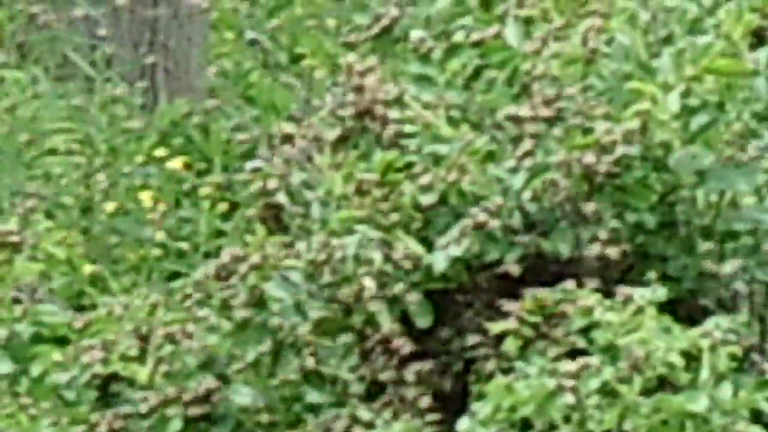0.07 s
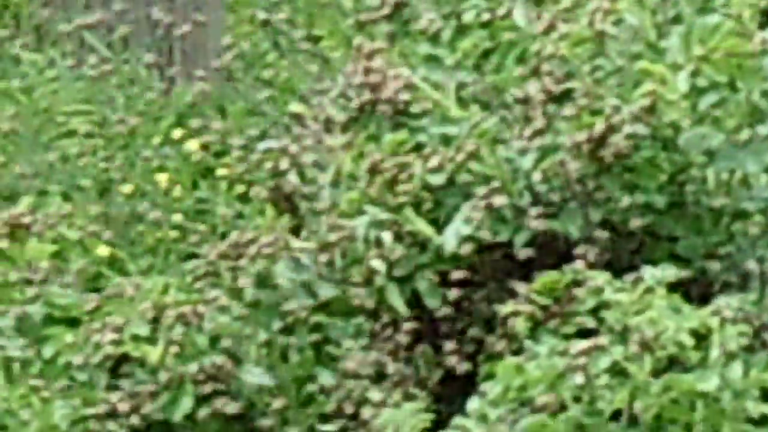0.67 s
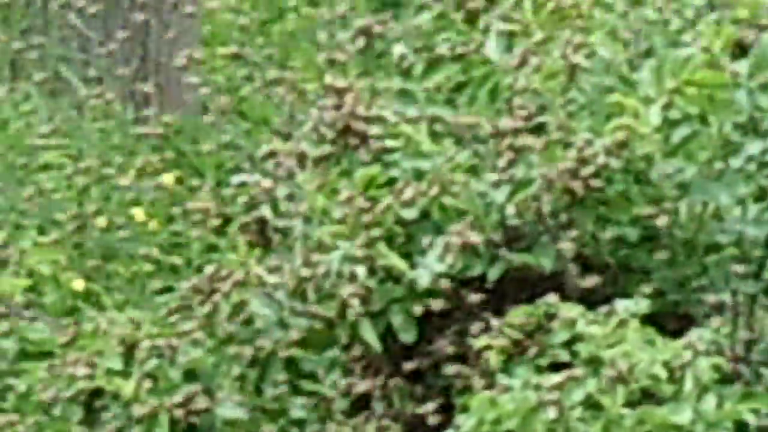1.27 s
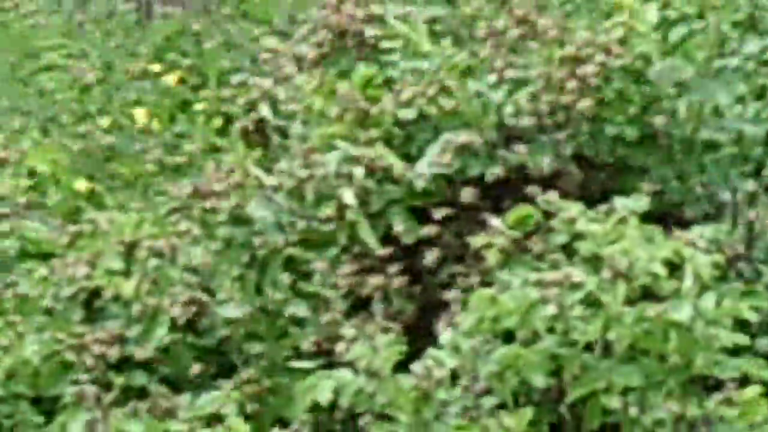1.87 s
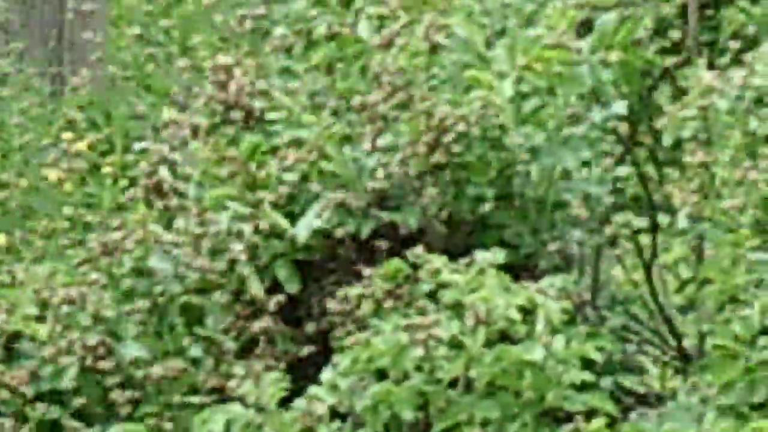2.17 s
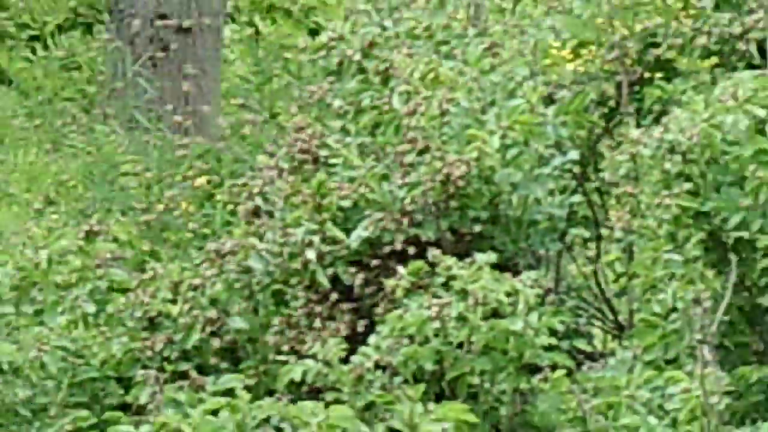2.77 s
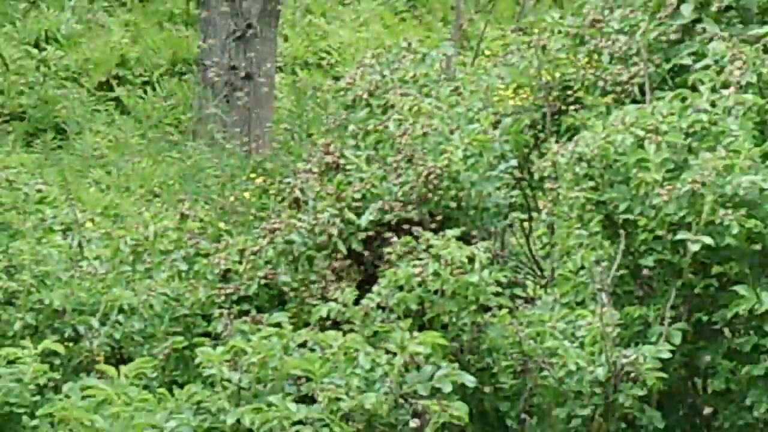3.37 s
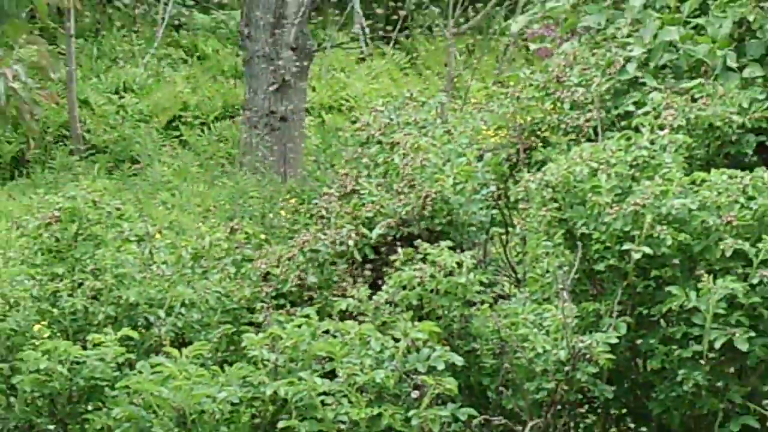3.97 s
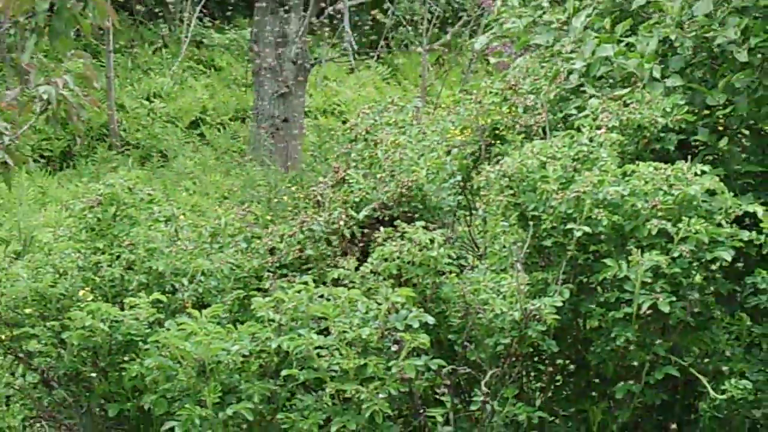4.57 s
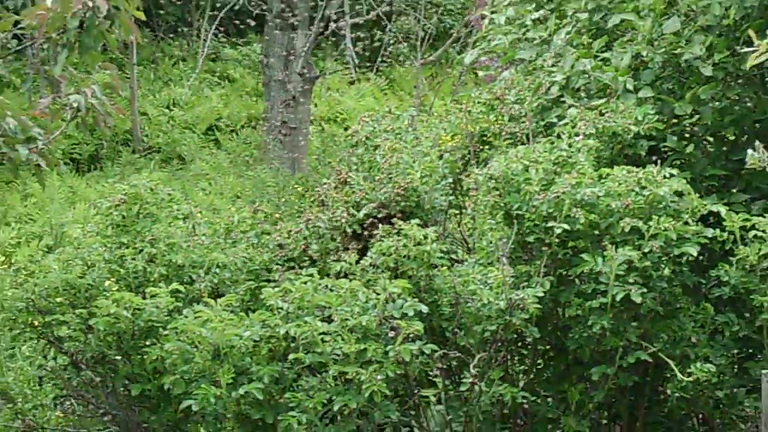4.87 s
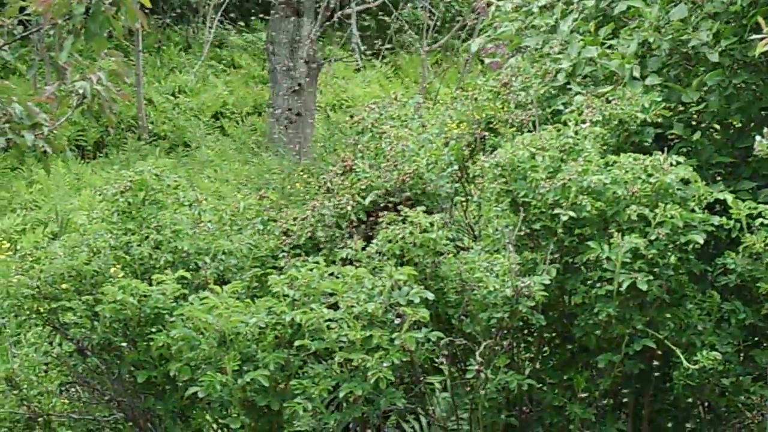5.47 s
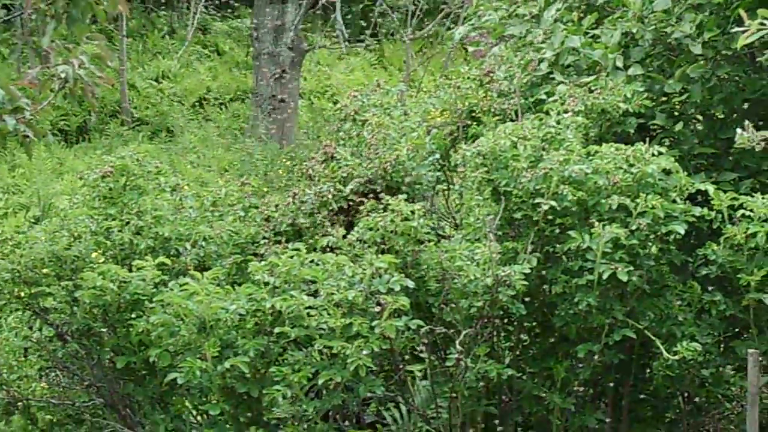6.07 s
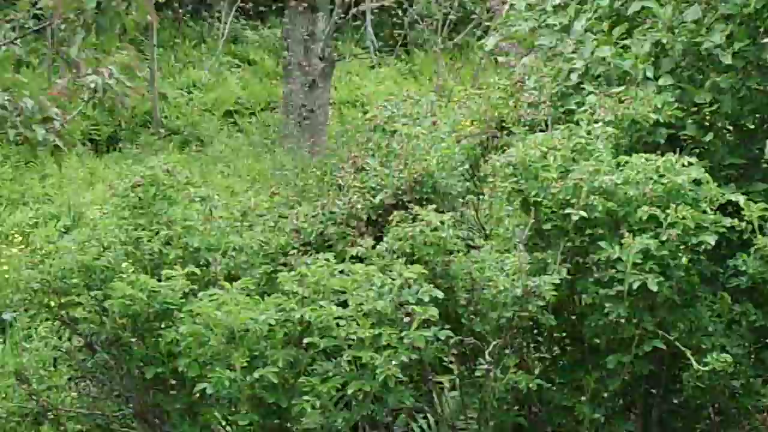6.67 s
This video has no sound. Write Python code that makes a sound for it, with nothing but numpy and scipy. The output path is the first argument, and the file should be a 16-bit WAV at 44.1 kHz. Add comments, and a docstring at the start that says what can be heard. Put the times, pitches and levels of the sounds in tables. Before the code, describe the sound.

Throughout, dozens of bees hum faintly in a bush some metres away, their wingbeats merging into one wavering, nasal buzz. It has most edge in the first two seconds, then turns rounder. Under it lie an even outdoor hiss, a deep rumble and low drones like far-off engines. Leaves stir very faintly at the start, and a soft rush of air swells around 1 second. Distant birds give thin whistles and a chip in the first second, then single high chips at about 1.5, 2, 3.3 and 3.6 seconds, with a light woodland echo. At about 5.4 seconds the plastic catch of a hand-held camera gives one sharp, dry, close click, followed by a soft low bump. From 5.7 seconds a distant bird warbles slurred notes while one low drone rises slightly, until the end at about 6.7 seconds. Everything stays very quiet.

```python
"""Bee swarm in a bush

Dozens of bees circle a bush some metres away, their wingbeats merging into a faint hum. Under it lie
a rumble, drones like far-off engines and an even hiss; leaves stir and settle. Distant birds chip and
whistle through the trees, and late on the plastic catch of a hand-held camera gives one sharp click."""
import sys
import numpy as np
from scipy import signal
from scipy.fft import rfft, irfft, next_fast_len
from scipy.io import wavfile

SR = 44100
rng = np.random.default_rng(int(sys.argv[2]) if len(sys.argv) > 2 else 0)


def wav_out(sig):
    """Save sig, one row per channel (or a flat mono array), as 16-bit PCM at SR to the path in sys.argv[1]."""
    wavfile.write(sys.argv[1], SR, np.round(np.clip(np.atleast_2d(sig).T, -1, 1) * 32767).astype(np.int16))


N = 295911
TIME = np.arange(N) / SR


def from_db(db):
    """Decibels to gain."""
    return 10 ** (np.asarray(db) / 20)


def rms_one(x):
    """Scale to unit rms."""
    return x / np.sqrt(np.mean(x ** 2) + 1e-20)


def in_time(points):
    """Draw an automation curve through (seconds, value) points."""
    return np.interp(TIME, *np.transpose(points))


def at_hz(points, hz):
    """Read an EQ curve on a log-frequency axis."""
    points_hz, points_db = np.transpose(points)
    return np.interp(np.log(hz), np.log(points_hz), points_db)


def drift(rate_hz):
    """Smooth random modulation with a spread of 1: noise twice through a one-pole low-pass."""
    hop = 100
    pole = np.exp(-2 * np.pi * rate_hz * hop / SR)
    noise = rng.standard_normal(N // hop + 1002)
    slow = signal.lfilter([1], [1, -2 * pole, pole * pole], noise)[1000:]
    return np.interp(np.arange(N) / hop, np.arange(len(slow)), rms_one(slow))


def band_noise(low_hz, high_hz):
    """White noise through a band-pass."""
    band = signal.butter(2, [low_hz, high_hz], "band", fs=SR, output="sos")
    return signal.sosfilt(band, rng.standard_normal(N + SR // 4))[SR // 4:]


def low_cut(x, hz, order=2):
    """Roll off the lows."""
    return signal.sosfilt(signal.butter(order, hz, "high", fs=SR, output="sos"), x)


def bees(wingbeat_hz=249.9, spread=.045, strays=.07, wander=.025, swell_db=2.5, count=28):
    """Each bee's wingbeat wavers as it turns and swells as it nears; a few stray from the common pitch."""
    # The nasal colour all bees share through the leaves. Each row: frequency in Hz, gain in dB.
    buzz_eq = [(245, 0.5), (380, -7.5), (465, 0.5), (520, -1), (750, -17.5), (930, -3.5), (1030, -5),
               (1140, -0.5), (1270, -6), (1350, -12), (1800, -17.5), (2500, -13), (4000, -22.5)]
    hum, size = np.zeros(N), 2048
    for detune in np.linspace(-1, 1, count):
        stroke = irfft(np.r_[0, np.exp(2j * np.pi * rng.random(16))], size)  # one beat, 16 harmonics
        pitch = wingbeat_hz * (1 + spread * detune + strays * detune ** 3 + wander * drift(1.0))
        beats = np.cumsum(pitch) / SR
        hum += stroke[(beats * size).astype(int) % size] * from_db(swell_db * drift(1.95))
    padded = next_fast_len(N)
    colour = from_db(at_hz(buzz_eq, np.fft.rfftfreq(padded, 1 / SR) + 1))
    return rms_one(irfft(rfft(hum, padded) * colour, padded)[:N])


def swarm(level_db=-66.5, rise_db_per_s=0.34, edge_hz=700):
    """The body of the hum creeps up; its nasal edge is strongest early, when the bees fly hardest."""
    # High shelf that gives the buzz its edge. Each row: time in seconds, gain in dB.
    edge_curve = [(0, 0.5), (1.9, 2), (2.3, -0.5), (5.4, -5), (6.71, -4)]
    hum = bees()
    edge = (from_db(in_time(edge_curve)) - 1) * low_cut(hum, edge_hz, order=1)
    return from_db(level_db + rise_db_per_s * TIME) * (hum + edge)


def rumble(level_db=-59.5, bump_s=5.5, bump_width_s=0.029, bump_db=8.5):
    """Shapeless deep outdoor noise with one soft bump."""
    bump = np.exp(-((TIME - bump_s) / bump_width_s) ** 2)
    return from_db(level_db + bump_db * bump) * rms_one(band_noise(14, 62))


def air(murmur_db=-73, rush_db=-66, rush_s=0.95, rush_width_s=0.54):
    """A steady murmur of moving air, and a soft low rush that swells once and ebbs."""
    swell = 1 / np.sqrt(1 + ((TIME - rush_s) / rush_width_s) ** 2)
    murmur = from_db(murmur_db) * rms_one(band_noise(85, 230))
    rush = from_db(rush_db) * swell * rms_one(band_noise(140, 320))
    return murmur + rush


def hiss(level_db=-65.5, flicker_db=0.66):
    """An even bed of narrow noise bands, each barely stirring."""
    # The tone of the open air. Each row: frequency in Hz, relative noise density in dB.
    air_eq = [(60, 19.5), (130, 2), (200, 6), (360, 6.5), (650, 8.5), (1150, 3.5), (1650, 0.5), (2500, 2),
              (3500, -3.5), (5000, -4.5), (7400, -10), (8700, -6), (11500, -13.5), (15500, -18.5)]
    edges = np.geomspace(60, 17000, 34)
    bed = np.zeros(N)
    for low, high in zip(edges, edges[1:]):
        band_db = at_hz(air_eq, np.sqrt(low * high))
        bed += band_noise(low, high) * from_db(band_db + flicker_db * drift(5.6))
    return from_db(level_db) * rms_one(bed)


def drone(hz, wander_hz, db, throb_db=2.5):
    """A low tone that wavers and throbs."""
    tone = np.sin(2 * np.pi * np.cumsum(hz + wander_hz * drift(3.2)) / SR)
    return from_db(db) * rms_one(tone * from_db(throb_db * drift(4.2)))


def drones(rev_s=5.75, rev_length_s=0.684, rev_hz=6.3, rev_db=10.5):
    """Low tones like far-off engines: two hold, one revs up near the end, one comes and goes."""
    # Fader ride on the upper drone. Each row: time in seconds, gain in dB.
    upper_swell = [(0, -1.5), (1, 3), (1.9, -5.5), (2.6, -5.5), (3.3, -6.5), (4, 3.5), (4.7, -7), (5.3, -3),
                   (6.71, -5)]
    rev = np.clip((TIME - rev_s) / rev_length_s, 0, 1)
    revving = from_db(rev_db * rev) * drone(53 + rev_hz * rev, wander_hz=2.31, db=-61)
    deep = drone(35, wander_hz=1.765, db=-60.5)
    faint = drone(138, wander_hz=1.92, db=-79.5)
    upper = from_db(in_time(upper_swell)) * drone(80.3, wander_hz=1.22, db=-63.5)
    return deep + faint + revving + upper


def leaves(level_db=-79, fade_db_per_s=5, flutter_db=3.5):
    """Foliage stirs with a faint fluttering sizzle, then settles."""
    envelope = from_db(level_db - fade_db_per_s * TIME + flutter_db * drift(19))
    return envelope * rms_one(band_noise(3800, 6500))


def bird_note(start, length, first_hz, middle_hz, last_hz, db, waver):
    """A whistle that swells and fades softly while it glides through three pitches."""
    out = np.zeros(N)
    span = (TIME >= start) & (TIME < start + length)
    progress = (TIME[span] - start) / length
    pitch = np.interp(progress, [0, .5, 1], [first_hz, middle_hz, last_hz]) * waver[span]
    envelope = from_db(db) * np.abs(np.sin(np.pi * progress)) ** 1.5
    out[span] = envelope * np.sin(2 * np.pi * np.cumsum(pitch) / SR)
    return out


def birds(chip_length_s=0.0128, chip_fall=0.11):
    """Pure held whistles, rasping chips that fall in pitch and, near the end, a warbled song."""
    # Held whistles. Each row: start in seconds, length in seconds, pitch in Hz, level in dB.
    whistle_notes = [(-.15, 0.42, 4380, -77), (0.133, 0.068, 4380, -78), (0.239, 0.043, 4385, -74),
                     (0.692, 0.11, 3075, -64.5), (5.9, 0.12, 2170, -69.5), (6.02, 0.15, 2155, -77),
                     (6.545, 0.12, 2014, -63)]
    # Short chips. Each row: start in seconds, centre pitch in Hz, level in dB.
    chip_notes = [(.555, 4550, -63.5), (1.551, 3930, -65), (2.041, 5420, -65.5), (3.268, 3630, -63),
                  (3.571, 3870, -63.5), (6.2, 2480, -63)]
    # Slurred song. Each row: start and length in seconds, first, middle and last pitch in Hz, level in dB.
    song_notes = [(5.72, 0.065, 3300, 2850, 2420, -70), (5.777, 0.04, 2400, 2320, 2230, -63.5),
                  (5.81, 0.063, 3200, 2960, 2970, -66), (5.883, .04, 2460, 2430, 2370, -64),
                  (5.899, .045, 2425, 2284, 2140, -61.5), (6.297, 0.073, 2570, 2695, 2900, -65.5),
                  (6.389, 0.029, 2910, 2780, 2570, -65), (6.408, 0.07, 2600, 2330, 2220, -62.5),
                  (6.676, 0.062, 2990, 2790, 2720, -61)]
    held = 1 + 0.0029 * drift(54)
    unsteady = 1 + 0.0085 * drift(68)
    rasp = 1 + 0.07 * rms_one(band_noise(200, 900))
    whistles = sum(bird_note(s, length, hz, hz, hz, db, held) for s, length, hz, db in whistle_notes)
    chips = sum(bird_note(s, chip_length_s, hz * (1 + chip_fall), hz, hz * (1 - chip_fall), db, rasp)
                for s, hz, db in chip_notes)
    song = sum(bird_note(*row, unsteady) for row in song_notes) * from_db(0.5 * drift(45))
    return whistles + chips + song


def woods(x, scatter_db=-4.5, t60=1.0, build_s=0.012):
    """Trunks and foliage add a scattered tail that builds up and fades smoothly."""
    age = TIME[:SR]
    tail = rng.standard_normal(SR) * from_db(-60 * age / t60) * (1 - np.exp(-age / build_s))
    return x + from_db(scatter_db) * signal.fftconvolve(x, tail / np.linalg.norm(tail))[:N]


def camera_shell(force):
    """A knock sets the plastic shell ringing briefly; it is too small to radiate bass."""
    # Shell resonances. Each row: frequency in Hz, gain in dB, time to fall 60 dB in seconds.
    modes = [(810, -26.5, 0.041), (1370, -28, 0.026), (1690, -19, 0.01), (1995, -25, 0.026),
             (2620, -25, 0.028), (3127, -16, 0.0098), (3300, -7.5, 0.0067), (3670, -10, 0.003),
             (4420, -16.5, 0.01), (5370, -10, 0.0046), (5840, -15.5, 0.006), (7100, -10, 0.0016),
             (9050, -8, 0.002), (11200, -2.5, 0.001), (14363, -14, 0.0024)]
    shell = np.zeros(N)
    for k, (hz, db, t60) in enumerate(modes):
        decay, angle = from_db(-60 / (t60 * SR)), 2 * np.pi * hz / SR
        ring = signal.lfilter([0, np.sin(angle)], [1, -2 * decay * np.cos(angle), decay ** 2], force)
        shell += (-1) ** k * from_db(db) * ring
    return low_cut(shell, 490)


def camera_click(gain_db=-3.1, scrape_s=0.0011, scrape_db=-13, crack_db=-4.8):
    """A plastic catch snaps over in a quick run of contacts; each cracks, scrapes and rings the shell."""
    # The catch touches, slips, grinds, strains, snaps over, scuffs, seats and rebounds.
    # Each row: start in seconds, strength in dB, brightness in Hz.
    contacts = [(5.41586, -37, 2000), (5.41863, -15, 700), (5.41946, -19, 1600), (5.42044, -31, 14000),
                (5.42144, -18, 18000), (5.42329, -25, 3900), (5.42465, -22.5, 5200), (5.4463, -37, 1800)]
    force, scrape = np.zeros(N), np.zeros(N)
    grit = rng.standard_normal(N)
    for s, db, bright_hz in contacts:
        start = round(s * SR)
        age = TIME[:N - start]
        tap_and_rub = np.array([age == 0, grit[start:] * np.exp(-age / scrape_s)]) + 1e-18
        softness = np.exp(-2 * np.pi * bright_hz / SR)
        tap, rub = from_db(db) * signal.lfilter([1 - softness], [1, -softness], tap_and_rub)
        force[start:] += tap
        scrape[start:] += rub
    crack = low_cut(from_db(crack_db) * force + from_db(scrape_db) * scrape, 1190)
    return from_db(gain_db) * (camera_shell(force) + crack)


def scene():
    """The mono mix: swarm over the outdoor bed, birds set back in the woods, the click dry."""
    mix = swarm() + air() + rumble() + hiss() + drones() + leaves() + woods(birds()) + camera_click()
    return mix[None]


def record(dry, cutoff_hz=15900, bias=.0066):
    """The converter cuts the top steeply and adds a small constant bias."""
    return bias + signal.sosfilt(signal.ellip(10, .1, 80, cutoff_hz, fs=SR, output="sos"), dry)


dry = scene()
out = record(dry)
wav_out(out)
```